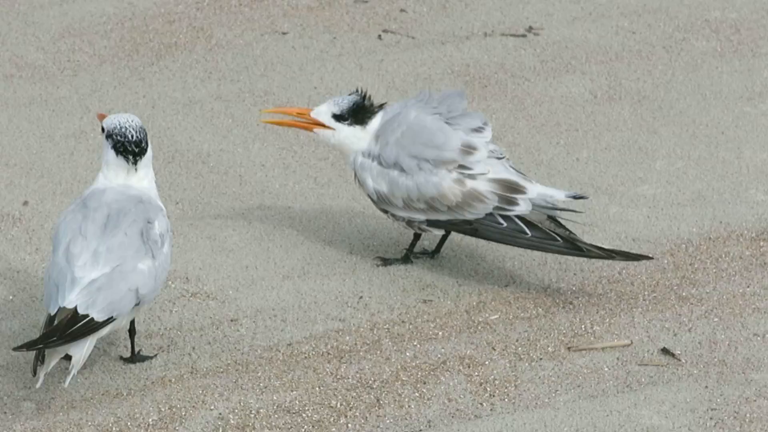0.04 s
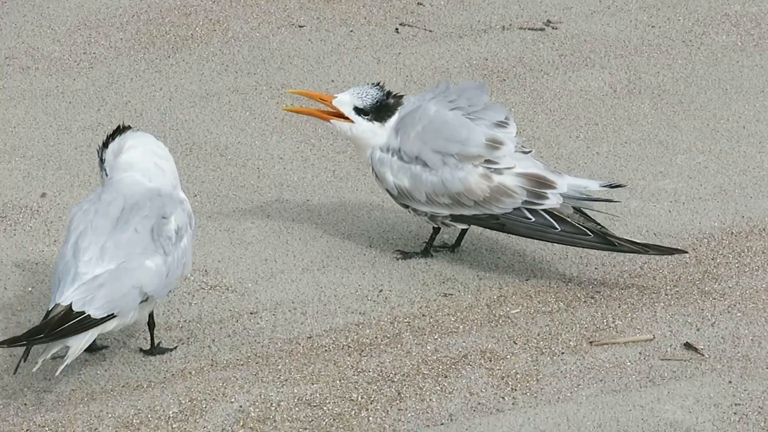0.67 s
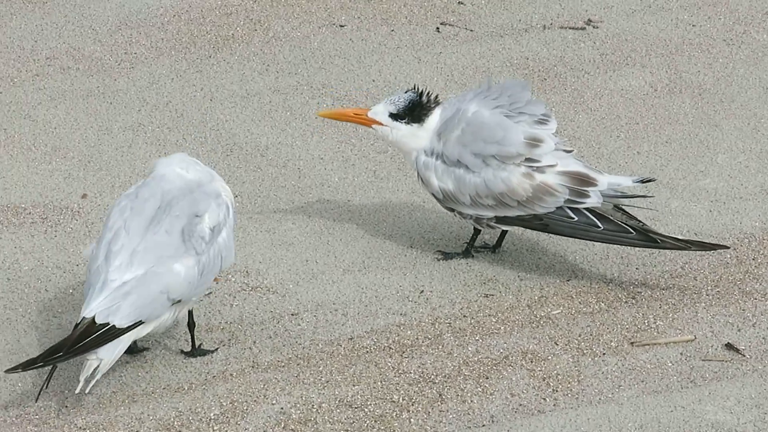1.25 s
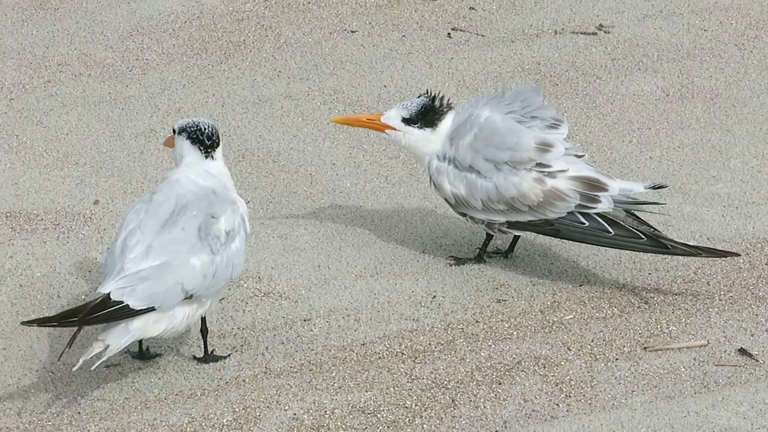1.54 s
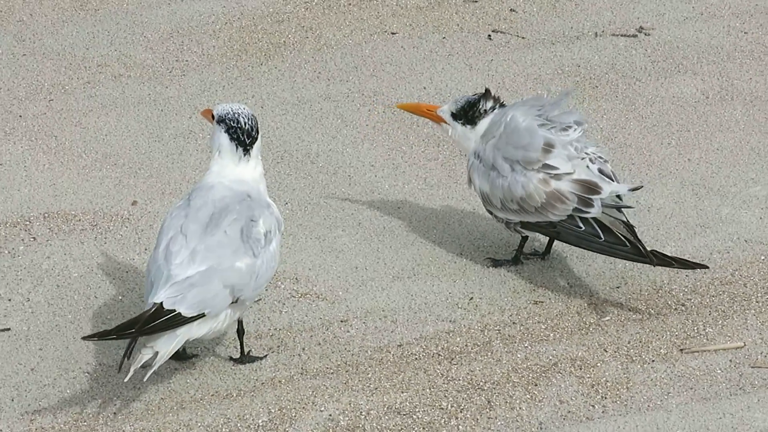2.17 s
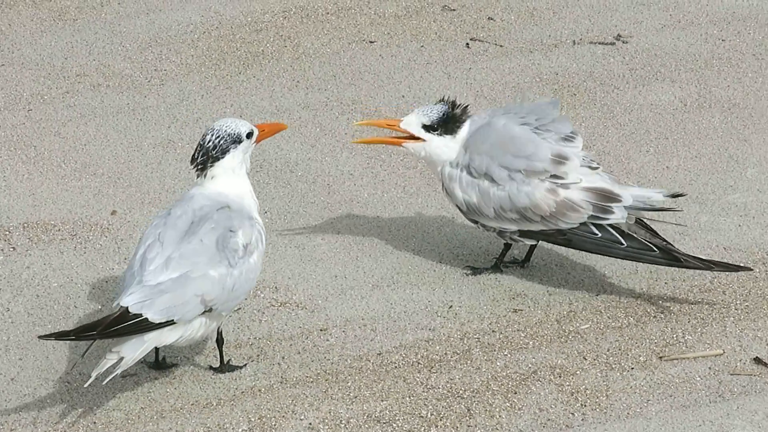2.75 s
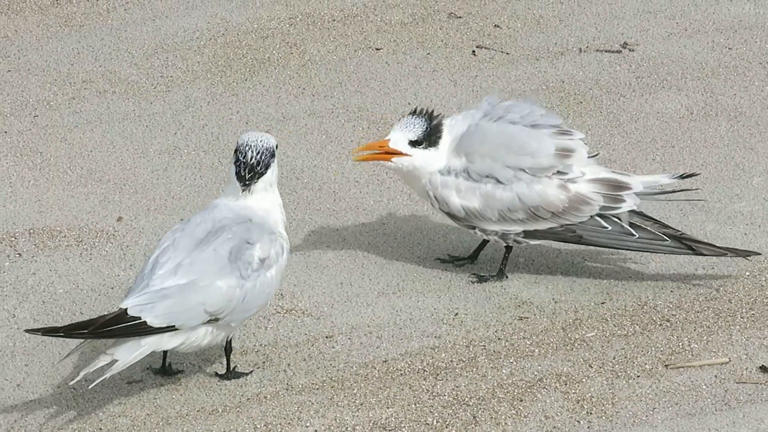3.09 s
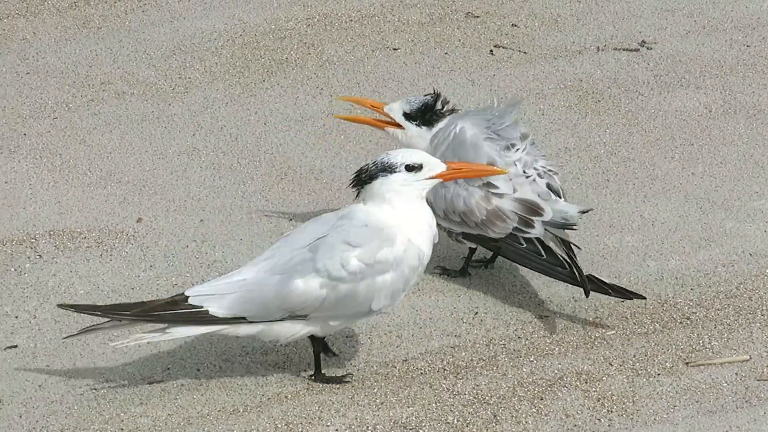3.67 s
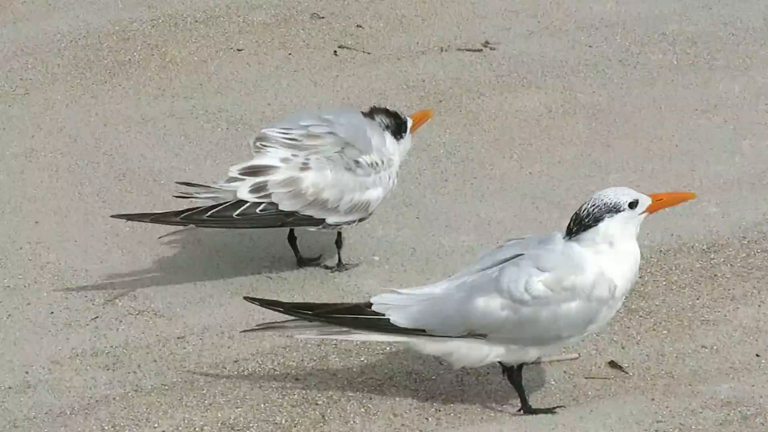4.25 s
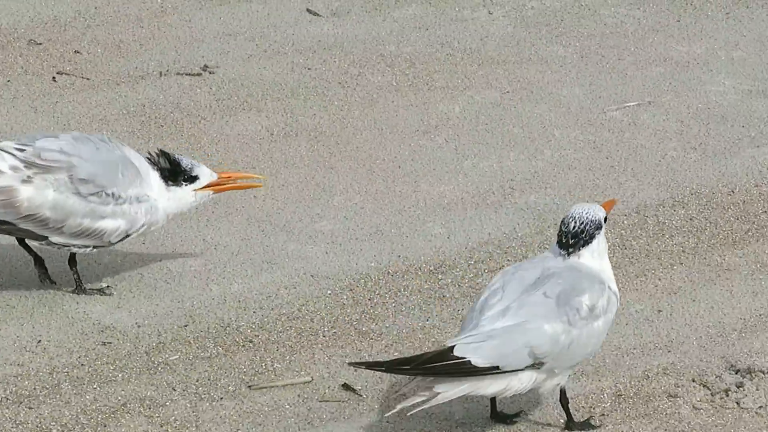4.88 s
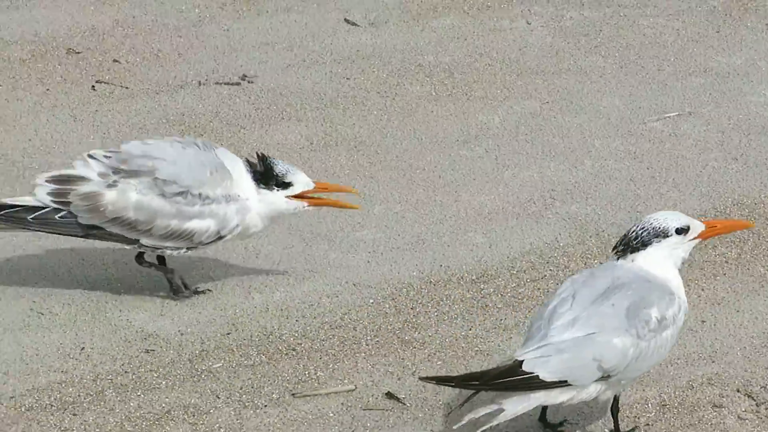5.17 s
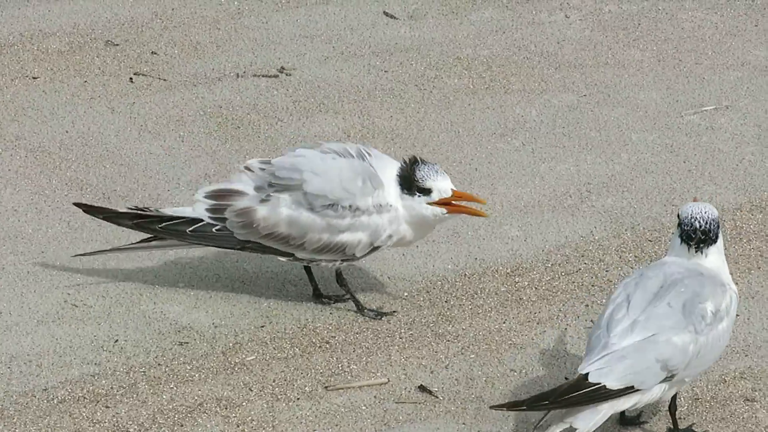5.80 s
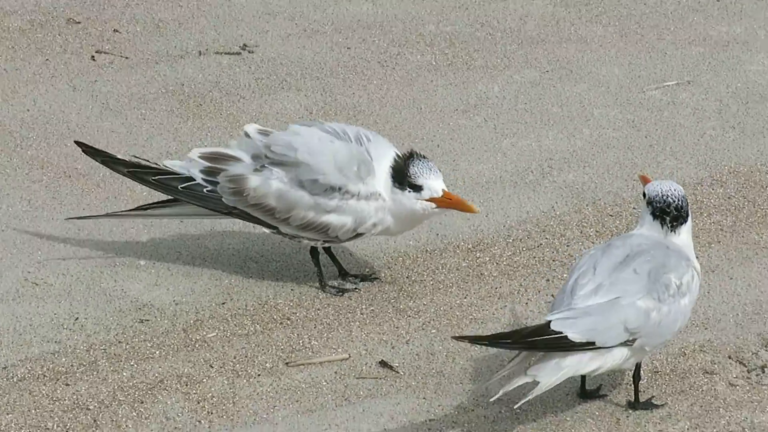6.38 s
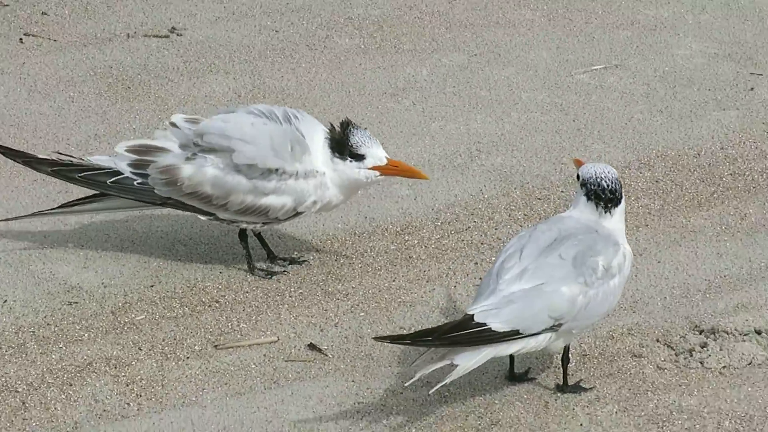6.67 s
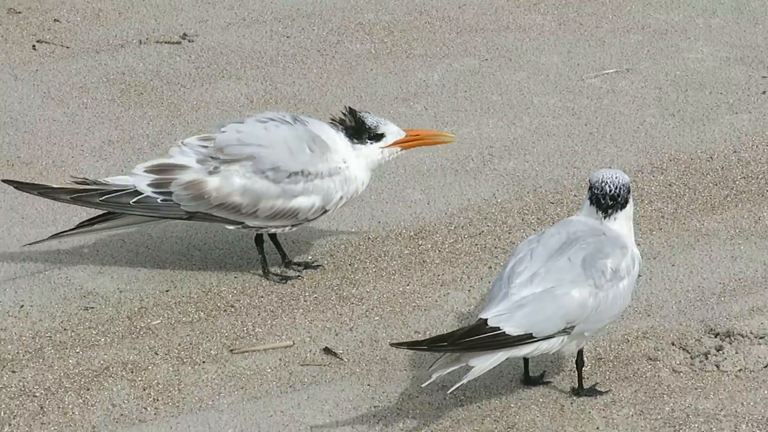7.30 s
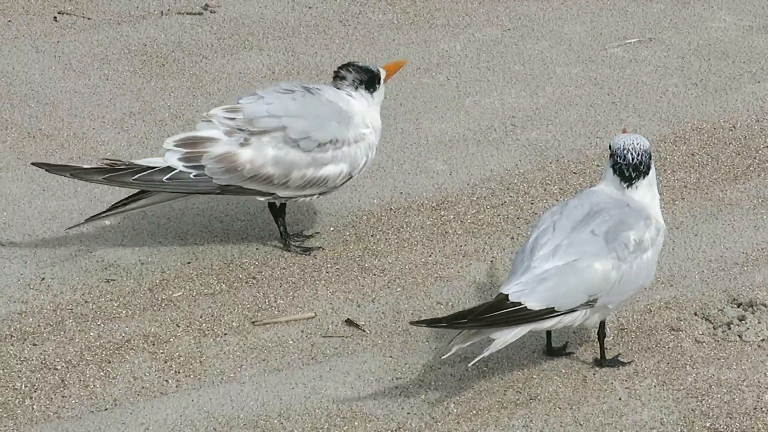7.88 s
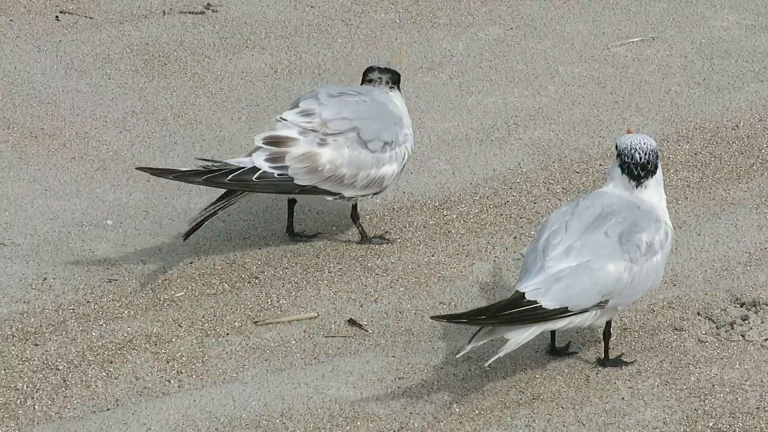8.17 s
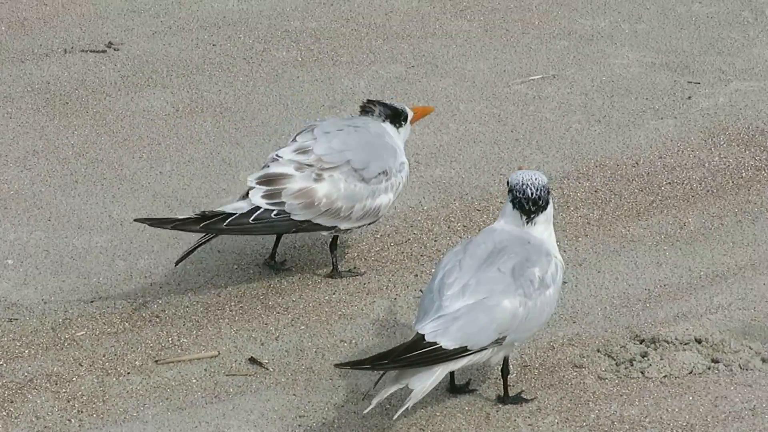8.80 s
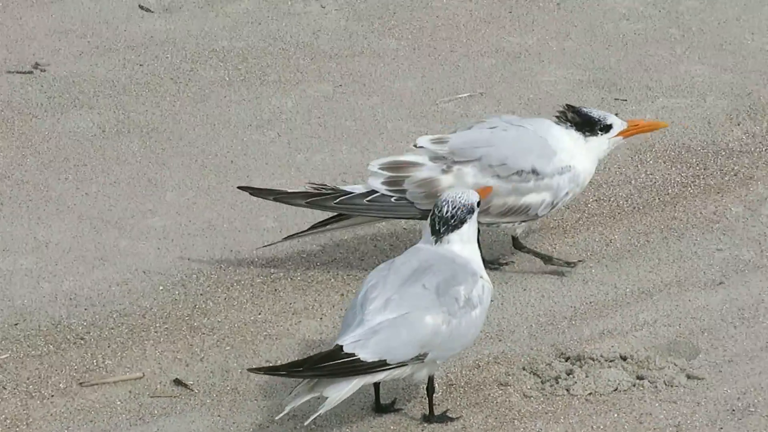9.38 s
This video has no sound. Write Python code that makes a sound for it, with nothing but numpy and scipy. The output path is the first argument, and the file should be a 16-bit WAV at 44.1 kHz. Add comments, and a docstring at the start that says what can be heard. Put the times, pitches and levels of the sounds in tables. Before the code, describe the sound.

Gusty wind roars and thumps on the microphone, with a tern's short, high chirping calls and low surf behind it.

```python
"""The microphone opens abruptly after a quarter of a second, on a beach where surf rumbles and hisses.
At once a stiff breeze buffets its two ports (sound holes); the hardest slams overload it and crack.
From 0.6 s a young tern a few metres away begs in bunches of thin whistles that arch up and fall.
After 7.5 s the whistles come singly and fainter, while the wind slams on to the end."""
import sys
import numpy as np
from scipy import signal
from scipy.fft import rfft, irfft, next_fast_len
from scipy.io import wavfile
from scipy.ndimage import uniform_filter1d

SR = 44100
rng = np.random.default_rng(int(sys.argv[2]) if len(sys.argv) > 2 else 0)


def materialize(psi):
    """Save the field psi as 16-bit PCM at rate SR to the path in sys.argv[1].

    A 1-D psi becomes a single channel; in a 2-D psi each row is a channel.
    """
    bounded = np.clip(np.atleast_2d(psi).T, -1, 1)
    quanta = np.round(bounded * 32767).astype(np.int16)
    wavfile.write(sys.argv[1], SR, quanta)


N = 416744
TIME = np.arange(N) / SR
FFT_SIZE = next_fast_len(N, real=True)
FREQS = np.fft.rfftfreq(FFT_SIZE, 1 / SR) + 1e-3
BANDS_HZ = 28 * 2 ** np.arange(0, 9.5, .5)  # half an octave apart


def amp(db):
    """Turn decibels into a gain."""
    return 10 ** (np.asarray(db) / 20)


def unit(x):
    """Scale a signal to an average strength (rms) of 1."""
    return x / np.sqrt(np.mean(x ** 2))


def at_pitch(hz, table, column=1):
    """Read between the rows of a table whose first column is pitch, stepping in octaves."""
    table = np.array(table)
    return np.interp(np.log(hz), np.log(table[:, 0]), table[:, column])


def filtered(x, response):
    """Scale and delay each frequency of a sound as the response says."""
    return irfft(rfft(x, FFT_SIZE) * response, FFT_SIZE)[..., :N]


def band_noise(hz):
    """Half an octave of noise with soft edges, strength 1."""
    octaves = np.log2(FREQS / hz)
    inside = np.abs(octaves) < .5
    random_bins = rng.standard_normal((inside.sum(), 2)) @ [1, 1j]
    spectrum = np.zeros(len(FREQS), complex)
    spectrum[inside] = np.cos(np.pi * octaves[inside]) * random_bins
    return unit(irfft(spectrum)[:N])


def drift(per_s):
    """A random curve of strength 1 that glides to per_s new values each second."""
    size = SR // per_s
    held = np.repeat(rng.standard_normal(N // size + 1), size)
    return unit(uniform_filter1d(held, size)[:N])


# The tone of the sea: (pitch [Hz], level per half octave [dB])
SURF_TONE = [(35, -65), (200, -44.5), (700, -45.5), (1500, -75), (3000, -65), (6000, -77), (10500, -68.5),
             (15500, -80.5)]
# The hiss of foam running up the sand: (time [s], relative level [dB])
FOAM_HISS = [(0.8, -75.5), (1.3, -67.5), (1.901, -68), (2.5, -73), (3.7, -69.5), (4.7, -72.5), (7.201, -69),
             (8.15, -66), (8.751, -69.5)]


def surf():
    """Breakers rumble with a slow swell; foam hisses above them, spread wide between the ears."""
    times, foam_db = np.transpose(FOAM_HISS)
    foam = unit(amp(np.interp(TIME, times, foam_db)))
    breakers = unit(amp(2 * drift(per_s=1)))
    out = np.zeros((2, N))
    for hz in BANDS_HZ:
        width = min(hz / 2500, .8)
        mid, side = band_noise(hz), width * band_noise(hz)
        swell = foam if hz > 4000 else breakers
        gain = amp(at_pitch(hz, SURF_TONE) + .5 * drift(per_s=8)) * swell
        out += gain * np.array([mid + side, mid - side]) / np.hypot(1, width)
    return out


# Wind has three strengths: push (big eddies, bass), churn (small eddies, middle) and rasp (treble).
# The breeze that never stops: (time [s], push [dB], churn [dB])
STEADY_BREEZE = [(.25, -26.5, -15.5), (1.05, -19.5, -23.5), (1.33, -17, -19.5), (1.46, -33.5, -33),
                 (1.68, -23.5, -34), (1.88, -19, -21), (2.32, -25.5, -31), (2.631, -23.5, -20.5),
                 (3.15, -24, -29), (3.45, -22, -26.5), (4.05, -21.5, -17.5), (4.582, -24, -16.5),
                 (4.7, -25, -24.5), (5.35, -28, -28), (5.55, -20, -19.5), (5.801, -23.5, -18),
                 (5.9, -26, -30.5), (6.17, -22.5, -26), (6.35, -22, -17), (6.72, -21.5, -17),
                 (7.2, -36.5, -24), (7.62, -37, -29.5), (8.16, -31, -26), (8.72, -24.5, -25.5),
                 (9.141, -46, -34.5), (9.45, -20.5, -23)]
# Separate gusts: (start [s], length [s], push [dB], churn [dB], rasp [dB])
WIND_GUSTS = [(0.467, 0.11, -28.5, -18, -16), (0.726, 0.14, -22, -19.5, -15.5),
              (1.289, 0.05, -36, -16.5, -37), (1.48, 0.152, -20.5, -21.5, -26.5),
              (1.714, 0.057, -17, -15, -17.5), (2.03, 0.074, -19.5, -15.5, -15),
              (2.137, 0.056, -18, -19.5, -20), (2.367, 0.15, -20.5, -19, -19),
              (2.631, 0.17, -37, -24, -15.5), (2.803, 0.11, -21, -17, -11.5),
              (3.48, 0.257, -20, -18.5, -16.5), (3.928, 0.27, -39, -36, -13.5),
              (4.295, 0.21, -29, -47, -10), (4.742, 0.334, -31, -18, -22),
              (5.134, 0.193, -19.5, -15.5, -14), (5.369, 0.136, -32.5, -15.5, -17.5),
              (6.052, 0.043, -24, -14.5, -10.5), (6.209, 0.12, -23.5, -19.5, -9.5),
              (6.836, 0.12, -32, -19, -46), (6.975, 0.1745, -26.5, -12.5, -19.5),
              (7.255, 0.229, -24, -17, -19.5), (7.294, 0.044, -18.5, -37, -8.5),
              (7.721, 0.044, -21, -24.5, -20), (7.858, 0.2, -33.5, -28, -26.5),
              (8.242, 0.33, -27.5, -17, -18), (8.459, 0.09, -19, -31, -8.5),
              (8.628, 0.037, -37, -8.5, -8.5), (8.818, 0.224, -22.5, -20.5, -22.5),
              (9.166, 0.15, -24, -28.5, -34)]


def airflow(attack_s=0.01, release_s=0.0034, breeze_rasp_db=-3, sway_db=0.8):
    """Push, churn and rasp in dB: each gust swells, holds and dies away on top of the breeze."""
    times, push, churn = np.transpose(STEADY_BREEZE)
    power = amp([np.interp(TIME, times, db) for db in (push, churn, churn + breeze_rasp_db)]) ** 2
    for start, length, *levels_db in WIND_GUSTS:
        span = slice(int(start * SR), int((start + length + .2) * SR))
        t = TIME[span] - start
        envelope = np.clip(t / attack_s, 0, 1) * np.exp(-np.maximum(t - length, 0) / release_s)
        power[:, span] += np.outer(amp(levels_db), envelope) ** 2
    return 10 * np.log10(power) + sway_db * drift(per_s=24)


# The tone of wind in the port that faces it: (pitch [Hz], level per half octave [dB])
WIND_TONE = [(35, -107), (60, -61), (120, -35), (220, -30), (400, -27), (700, -23), (1200, -28.5),
             (2000, -38), (3200, -58.5), (5000, -66.5), (15000, -100)]


def eddies(push_db, churn_db, rasp_db, bursts_per_s=220, bass_flutter_db=1.53, treble_flutter_db=6.0):
    """Swirling air roars. Small eddies come in bursts, so the treble flutters harder than the bass."""
    kicks = (rng.random(N) < bursts_per_s / SR) * rng.random(N)
    bursts = filtered(kicks, 1 / (1 + 1j * FREQS / 45) / (1 + 1j * FREQS / 500))  # each fades in a few ms
    bursts = 2.6 * np.tanh(unit(bursts - bursts.mean()) / 2.6)
    # the port rings hollow when churn outweighs push, and higher the more it does
    hollow = np.clip((churn_db - push_db) / 16, 0, 1)
    hollow_hz = 620 + 300 * hollow
    shared, left_only = np.zeros(N), np.zeros(N)
    for hz in BANDS_HZ:
        past_bass = at_pitch(hz, [(280, 0), (750, 1)])
        past_middle = at_pitch(hz, [(950, 0), (1900, 1)])
        drive_db = push_db + past_bass * (churn_db - push_db) + past_middle * (rasp_db - churn_db)
        flutter_db = at_pitch(hz, [(150, bass_flutter_db), (3000, treble_flutter_db)])
        ring_db = 4.5 * hollow / (1 + (2 * (hz / hollow_hz - hollow_hz / hz)) ** 2)
        swell = unit(amp(drive_db + ring_db + flutter_db * bursts)) * amp(at_pitch(hz, WIND_TONE))
        shared += swell * band_noise(hz)
        left_only += swell * band_noise(hz)
    return shared, left_only


def puffs(churn_db, puff_db=-6, puff_hz=720, per_s=90):
    """Single whirls of air pop against the port, most small, a few large, harder as the air churns."""
    sizes = amp(3 * np.minimum(rng.standard_exponential(N), 2)) * rng.choice([-1, 1], N)
    kicks = sizes * (rng.random(N) < per_s / SR)
    ratio = 1j * FREQS / puff_hz
    pops = filtered(kicks, ratio / (1 + ratio + ratio ** 2) ** 2 / (1 + ratio / 2))
    return unit(pops) * amp(puff_db + churn_db)


# Hard hits of wind: (time [s], pressure swing [dB], swirl time either side [s], steep front [dB])
WIND_SLAMS = [ (.245, 1.5, 0.0022, -15), (0.255, 0, 0.012, -10), (.321, -9, 0.0012, -16),
              (0.34, -0.5, 0.0037, -11.5), (0.505, -3, 0.00058, -17.5), (.552, 0.5, 0.0017, -15),
              (.636, -10, 0.00067, -17), (0.773, 1, 0.00023, -8), (0.818, -8, 0.004, -18.5),
              (1.317, -2.5, 0.0015, -24), (2.087, -3, 0.0048, -24), (2.476, -3.5, 0.0026, -37),
              (3.28, -11, 0.0034, -33), (3.57, -5, 0.00073, -21), (3.687, -4, 0.0014, -23),
              (3.939, -5, .002, -24), (4.011, -2.5, 0.0022, -25), (4.308, -13, 0.0023, -21),
              (4.446, -1, 0.0011, -20), (4.757, -2, 0.0013, -22), (5.299, 2, 0.0028, -6.5),
              (6.076, 1, 0.0056, -12), (6.313, -2.5, 0.0044, -17.5), (6.628, -0.5, 0.0021, -6.5),
              (7.939, -8.5, 0.0037, -50), (8.403, -1.5, 0.0017, -7), (8.476, 3.5, 0.0017, -6),
              (8.485, -5.5, 0.003, -7.5), (8.506, -2.5, 0.0081, -4.5), (8.587, -8, 0.0013, -30),
              (8.649, -6, 0.006, -11.5), (8.882, -1.5, 0.0049, -24), (9.003, -6.5, 0.0011, -26),
              (9.092, -8, 0.0092, -29), (9.277, -7, 0.0089, -34)]


def slams(swirl_db=-7, swirl_hz=750, swing_s=0.00024, front_s=0.000015, relax_s=0.00022,
          crunch_per_s=900, crunch_hz=2200, crunch_db=-28):
    """A big whirl hits the port: the pressure swings, its steep front cracks and small fronts crunch."""
    out = np.zeros(N)
    swirl = unit(filtered(rng.standard_normal(N), FREQS / swirl_hz / (1 + (FREQS / swirl_hz) ** 5)))
    ticks = rng.standard_normal(N) * (rng.random(N) < crunch_per_s / SR)
    ratio = 1j * FREQS / crunch_hz
    crunch_tone = ratio ** 2 / (1 + ratio + ratio ** 2) / (1 + ratio) ** 2
    crunch = amp(crunch_db) * unit(filtered(ticks, crunch_tone))
    for hit_s, swing_db, swirl_s, front_db in WIND_SLAMS:
        span = slice(int((hit_s - .04) * SR), int((hit_s + .04) * SR))
        t = TIME[span] - hit_s
        core = np.exp(-.5 * (t / swing_s) ** 2)
        swing = np.exp(.5) * t / swing_s * core
        steepness = amp(front_db) ** .3  # a weak front is also blunter
        front = np.tanh(t / front_s * steepness) * np.exp(-np.abs(t) / relax_s)
        small_fronts = crunch[span] * np.exp(-np.abs(t) / (2 * swirl_s))
        around = amp(swirl_db) * swirl[span] * np.exp(-.5 * (t / swirl_s) ** 2) * (1 - core)
        out[span] += amp(swing_db) * (swing + around) + amp(front_db) * (front + small_fronts)
    return out


# The sheltered left port compared with the right: (pitch [Hz], lag [radians], gain [dB])
SHELTERED_PORT = [(60, 0, .5), (130, .1, 1.5), (280, 1.1, 2), (430, 1.9, 0), (700, 2.6, -3),
                  (1400, 3.1, -6), (2100, 3.7, -7), (6000, 9.2, -6)]


def wind(membrane_limit=.7, left_slam_db=-3):
    """Eddies strike the right port, then reach the left later and duller, mixed with its own eddies."""
    push_db, churn_db, rasp_db = airflow()
    shared, left_only = eddies(push_db, churn_db, rasp_db)
    right = shared + puffs(churn_db)
    own_share = np.interp(FREQS, [80, 250, 700], [0.029, 0.31, 0.63])
    delay = np.exp(-1j * at_pitch(FREQS, SHELTERED_PORT, column=1))
    gain = amp(at_pitch(FREQS, SHELTERED_PORT, column=2))
    carried_over = filtered(right, gain * np.sqrt(1 - own_share ** 2) * delay)
    left = carried_over + filtered(left_only, gain * own_share)
    # the microphone's membranes give way softly on the peaks, which roughens strong gusts
    pressure = np.array([left, right])
    pressure = pressure / (1 + (pressure / membrane_limit) ** 4) ** .25
    slam = slams()  # large enough to hit both ports
    return pressure + np.array([amp(left_slam_db) * filtered(slam, gain * delay), slam])


def crackle(load, crack_db=-39, crack_hz=4200):
    """The input sputters on each peak that nears full load: dull ticks in gusts, a dry crack on a slam."""
    ratio = FREQS / crack_hz
    spikes = rng.standard_normal((2, N)) ** 5
    fizz = unit(filtered(spikes, ratio ** 2 / (1 + ratio ** 2) ** 2.4))
    return amp(crack_db) * fizz * np.abs(load) ** 3


def whistle_pitch(t, length, top_hz, strain, sag_hz_per_s=1700, rise_s=0.011, break_s=0.0008):
    """Easy calls start nearly level and droop; strained ones rise, hold, break to a lower note and sink."""
    # a higher call starts and ends higher, a longer one lower
    above_easy_hz, sag_hz = top_hz - 4290, sag_hz_per_s * length
    start_hz = min(top_hz, 4310 + 0.25 * above_easy_hz - sag_hz)
    end_hz = 3990 + 0.4 * above_easy_hz - sag_hz
    low_hz = min(top_hz, 4400 - 150 * strain)
    fall_s = np.interp(strain, [0, .5], [0.0255 + 0.41 * length, 0.026])
    top_ends_s = max(length - fall_s, 1e-3)
    top_starts_s = top_ends_s * (1 - .6 * np.sqrt(strain))
    risen = np.cos(np.pi / 2 * np.clip((top_starts_s - t) / min(top_starts_s, rise_s), 0, 1)) ** 2
    broken = (1 + np.tanh((t - top_ends_s) / break_s)) / 2
    sunk = np.clip((t - top_ends_s) / fall_s, 0, 1) ** (1.7 - strain)
    return start_hz + (top_hz - start_hz) * risen + (low_hz - top_hz) * broken + (end_hz - low_hz) * sunk


# The bird's begging calls: (start [s], length [s], top pitch [Hz], level before the beak shapes it [dB])
BEGGING_CALLS = [ (0.607, 0.065, 4450, -54), (0.665, 0.067, 4670, -47), (0.803, 0.056, 4560, -52.5),
                 (1.683, 0.061, 4760, -47), (1.786, 0.059, 4400, -49.5), (1.937, 0.054, 4240, -54),
                 (2.655, 0.054, 4780, -50), (2.766, 0.061, 4600, -51), (2.902, 0.051, 4520, -48.5),
                 (3.055, 0.054, 4530, -46), (3.227, 0.054, 4500, -43), (3.637, 0.046, 4440, -64),
                 (3.692, 0.072, 4750, -54.5), (3.86, 0.041, 4650, -57), (4.047, 0.073, 4240, -58),
                 (4.149, 0.068, 4270, -58), (4.508, 0.065, 4260, -54), (4.694, 0.042, 4210, -52),
                 (4.86, 0.055, 4230, -48), (5.195, 0.072, 4210, -50.5), (5.274, 0.068, 4250, -45),
                 (5.427, 0.053, 4210, -47), (5.842, 0.054, 4180, -44.5), (5.896, 0.075, 4320, -43),
                 (6.048, 0.054, 4270, -47), (7.149, 0.1, 4360, -50.5), (7.28, 0.067, 4300, -49),
                 (7.974, 0.099, 4330, -58.5), (8.54, 0.046, 4320, -56), (8.975, 0.12, 4370, -61),
                 (9.154, 0.075, 4300, -61)]


def tern(beak_hz=4330, beak_width_hz=600, overtone_db=-22, waver=0.0033, attack_s=0.014, release_s=0.02):
    """Nearly pure whistles, strongest near the pitch at which the throat and beak ring."""
    out = np.zeros(N)
    wobble, tremble = 1 + waver * drift(per_s=250), amp(drift(per_s=150))
    for start, length, top_hz, db in BEGGING_CALLS:
        span = slice(int(start * SR), int((start + length) * SR))
        t = TIME[span] - start
        strain = np.clip((top_hz - 4300) / 450, 0, 1)  # high calls are strained
        hz = whistle_pitch(t, length, top_hz, strain) * wobble[span]
        phase = 2 * np.pi * np.cumsum(hz) / SR
        beak = 1 / np.hypot(1, (hz - beak_hz) / beak_width_hz)
        ramp = np.clip(np.minimum(t / attack_s, (length - t) / release_s), 0, 1)
        effort = np.sin(np.pi / 2 * ramp) ** 2
        overtone = amp(overtone_db + 6 * strain ** .5) * np.sin(2 * phase)
        out[span] += np.sqrt(2) * amp(db) * effort * tremble[span] * (beak * np.sin(phase) + overtone)
    return out


def scene():
    """Bird, wind and sea with no echo. The bird is straight ahead, the same in both ears."""
    return tern() + wind() + surf()


def record(dry, open_s=.242, ceiling=0.76, notch_hz=2850, notch_width_hz=480, bass_hz=52, top_hz=15900):
    """The input opens and clips the hardest slams; deep bass, a narrow treble band and the top are cut."""
    opened = np.clip((TIME - open_s) / .002, 0, 1)
    limit = ceiling + (1 - ceiling) * np.exp(-np.maximum(TIME - open_s, 0) / .25)  # settles from 1
    clipped = np.clip(dry * opened, -limit, limit)
    heard = clipped + crackle(clipped / limit)
    heard = filtered(heard, 1 - .5 / (1 + ((FREQS - notch_hz) / notch_width_hz) ** 2))
    heard = signal.sosfilt(signal.butter(3, bass_hz, "high", fs=SR, output="sos"), heard)
    return signal.sosfilt(signal.ellip(8, .2, 70, top_hz, fs=SR, output="sos"), heard)


dry = scene()
out = record(dry)
materialize(out)
```